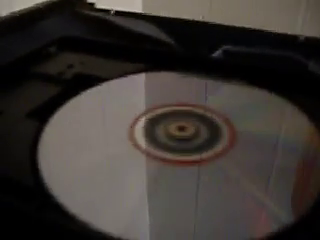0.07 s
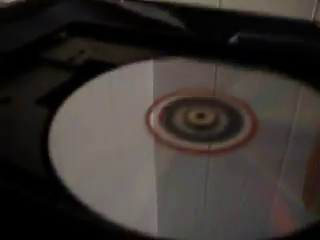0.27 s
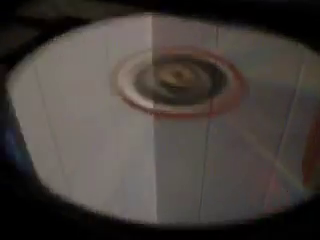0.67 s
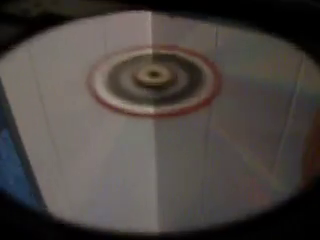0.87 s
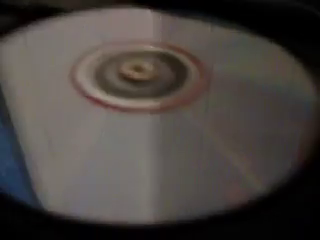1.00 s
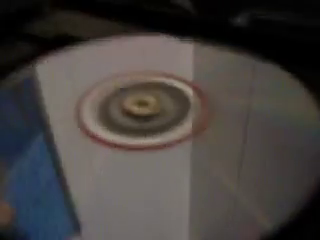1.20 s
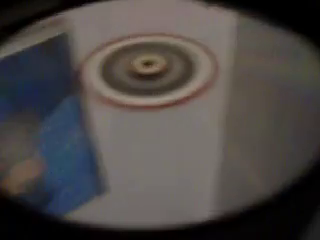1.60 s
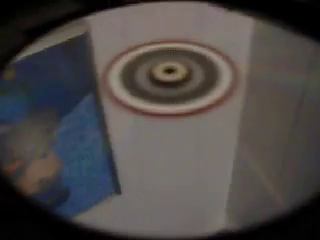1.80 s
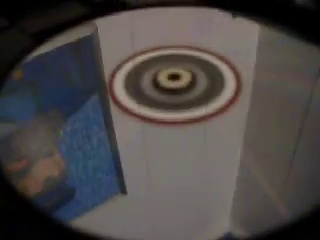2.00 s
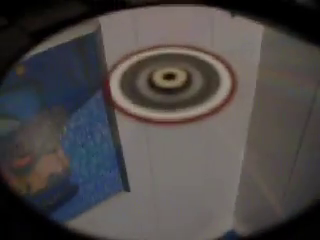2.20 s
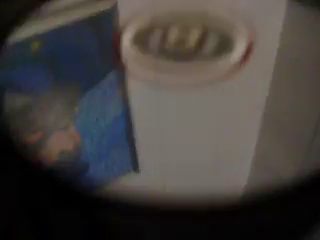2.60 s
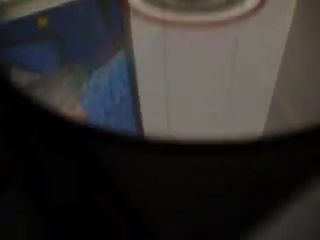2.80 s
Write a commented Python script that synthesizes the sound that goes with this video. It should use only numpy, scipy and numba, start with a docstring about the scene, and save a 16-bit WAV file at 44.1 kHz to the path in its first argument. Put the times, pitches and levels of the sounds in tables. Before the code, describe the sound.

A disc drive, close in a small room, clicks and jolts, then buzzes and grinds at a steady pitch from 0.25 to 0.55 seconds. Sharp plastic clicks and a scrape around 1.1 lead into a second buzz until 1.6. After more jolts, a third starts at 2.35 and groans down by 2.7, followed by a high whistling hiss. A faint hum and thin electronic whine continue throughout.

```python
"""In a small room, close by, an open disc drive tries three times to read a disc.
Its lens servo hisses and small plastic parts click. On each try the motor jolts the frame,
then buzzes and grinds the gears at a nearly steady speed; the last try runs down with a groan.
A hum and a thin electronic whine stay on throughout."""
import sys
import numpy as np
from scipy import signal
from scipy.fft import rfft, irfft
from scipy.io import wavfile
from numba import njit

SR = 44100
rng = np.random.default_rng(int(sys.argv[2]) if len(sys.argv) > 2 else 0)


def generate_wav(signal):
    """Clip the signal to [-1, 1] and save it as 16-bit WAV at the path in sys.argv[1]."""
    frames = np.transpose(np.atleast_2d(signal))
    scaled = np.clip(frames, -1, 1) * 32767
    pcm = np.round(scaled).astype(np.int16)
    wavfile.write(sys.argv[1], SR, pcm)


N = 130095


def undb(db):
    """Turn decibels into a number to multiply by."""
    return 10 ** (np.asarray(db) / 20)


def unit(x):
    """Scale a sound to an average (rms) size of 1."""
    return x / np.sqrt(np.mean(x ** 2) + 1e-18)


def clock():
    """The time of each sample, in seconds."""
    return np.arange(N) / SR


def noise():
    """Plain white hiss."""
    return rng.standard_normal(N)


def wander(rate):
    """A smooth random curve that changes about rate times a second."""
    return unit(irfft(rfft(noise()) * np.exp(-(np.fft.rfftfreq(N, 1 / SR) / rate) ** 2), N))


def colour(x, points):
    """Shape a sound's lows and highs along (f/Hz, level/dB) points, then scale it to size 1."""
    hz, db = np.array(points).T
    curve_db = np.interp(np.log(np.fft.rfftfreq(N, 1 / SR) + 1), np.log(hz), db)
    return unit(irfft(rfft(x) * undb(curve_db), N))


def resonate(x, hz, width_hz):
    """Let a sound ring around one pitch."""
    return signal.lfilter(*signal.iirpeak(hz, hz / width_hz, fs=SR), x)


def gate(start, length, attack, decay):
    """A loudness shape that rises, holds and dies away; all times in seconds."""
    t = clock() - start
    return np.clip(t / attack + .5, 0, 1) * np.exp(-np.maximum(t - length, 0) / decay)


def contour(times, db, fade_s=0.0068):
    """A loudness shape that joins the given points and fades beyond both ends."""
    t = clock()
    outside_s = np.maximum(times[0] - t, 0) + np.maximum(t - times[-1], 0)
    return undb(np.interp(t, times, db)) * np.exp(-outside_s / fade_s)


def rough_tone(cycles, rough, rate):
    """A tone that flutters about rate times a second; rough = 0 makes it pure."""
    angle = 2 * np.pi * (cycles + rng.random())
    tone = np.sin(angle) * (np.sqrt(2) + rough * wander(rate))
    jitter = np.cos(angle) * rough * wander(rate)
    return (tone + jitter) / np.sqrt(1 + rough ** 2)


def glide(rows, rough, rate):
    """A rough tone that slides along (t/s, f/Hz, level/dB) points."""
    times, hz, db = np.array(rows).T
    cycles = np.cumsum(np.interp(clock(), times, hz)) / SR
    return contour(times, db) * rough_tone(cycles, rough, rate)


# the hum and the whine: f/Hz, level/dB, roughness
STEADY_TONES = [(222.8, -48, .7), (7180, -68, 0.1), (7230, -62, 0.2), (7882, -54, 0.2), (8097, -55, 0)]
# tone colour of the background hiss: f/Hz, relative level/dB
HISS_COLOUR = [(20, -60.5), (40, -67), (100, -69.5), (200, -75.5), (700, -83.5), (1300, -88), (3000, -90),
               (6800, -90.5), (7500, -85), (8200, -89.5), (9000, -108)]
def background():
    """A hum, a thin electronic whine and a soft hiss that never stop."""
    hiss = undb(-45) * colour(noise(), HISS_COLOUR)
    return hiss + sum(undb(db) * rough_tone(hz * clock(), rough, rate=12)
                      for hz, db, rough in STEADY_TONES)


# bursts from the lens servo: t/s, length/s, hiss level/dB, whistle level/dB
SERVO_BURSTS = [(0.121, 0.067, -48, -65), (2.228, 0.036, -49, -65), (2.679, 0.44, -46.5, -44.5)]
# tone colour of its hiss: f/Hz, relative level/dB
SERVO_HISS = [(2500, -29), (3500, -12), (4200, -3), (4650, -8), (5150, 0.5), (5500, -1.5), (6400, 2),
              (7200, -4.5), (8500, -25.5)]
# its faint rising squeal near the end: t/s, f/Hz, level/dB
SERVO_SQUEAL = [(2.86, 3890, -55), (2.9, 4270, -48), (2.95, 4310, -57)]
def servo(whistle_hz=6420, width_hz=320, flicker_db=3.7):
    """The servo, which moves the lens, hisses and whistles unsteadily."""
    hiss = colour(noise(), SERVO_HISS) * undb(flicker_db * wander(90))
    whistle = unit(resonate(resonate(noise(), whistle_hz, width_hz), whistle_hz, width_hz))
    out = glide(SERVO_SQUEAL, rough=1.2, rate=110)
    for start, length, hiss_db, whistle_db in SERVO_BURSTS:
        burst = gate(start, length, attack=0.015, decay=0.012)
        out += burst * (undb(hiss_db) * hiss + undb(whistle_db) * whistle)
    return out


# pitches at which the frame rings: f/Hz, width/Hz, level/dB
FRAME_RINGS = [(234, 12, 1), (494, 27, -3.5), (514, 31, -4), (573, 30, 6.5), (660, 64, 5.5), (779, 49, 5),
               (862, 46, 4.5), (945, 23, -22.5), (1790, 460, -23)]
def frame(x):
    """The plastic frame rings when shaken, but gives off little below its lowest pitch."""
    rings = sum(undb(db) * resonate(x, hz, width) for hz, width, db in FRAME_RINGS)
    return signal.sosfilt(signal.butter(2, [170, 2300], 'band', fs=SR, output='sos'), rings)


# clicks of the mechanism: t/s, level/dB, ring f/Hz, ring decay/s, relative snap level/dB
PART_CLICKS = [(0.184, -27, 6960, 0.0013, -4.5), (0.2416, -18, 7600, 0.0006, -4),
               (0.2474, -23.5, 7400, 0.00092, 0), (0.4443, -22, 2180, 0.0005, 11.5),
               (1.0495, -15.5, 1710, 0.0014, -22.5), (1.092, -25, 1463, 0.0015, 7),
               (1.1252, -14.5, 7400, 0.00063, 2), (1.1255, -14.5, 803, 0.0029, -5),
               (1.1605, -19, 2500, 0.0012, -8), (1.1726, -16.5, 2480, 0.0025, -9),
               (1.177, -6, 2610, 0.0017, 1.5), (1.189, -13, 1826, 0.0022, 4.5),
               (1.2092, -26.5, 680, 0.0058, -3), (1.217, -26.5, 6600, 0.0017, -7),
               (1.6297, -41, 916, 0.0022, 9.5), (2.748, -26, 654, 0.0031, -15.5)]
# tones in one click: multiple of its ring pitch, relative level/dB
PART_RINGS = [(0.619, -11), (0.999, 0), (1.15, -24.5), (1.45, -19)]
# tone colour of the snap: f/Hz, relative level/dB
PART_SNAP = [(350, 1), (750, 10.5), (1200, 0.5), (2600, 11), (3500, -9.5), (6400, -4), (7500, -5.5)]
def clicks(snap_s=0.0011, contact_cycles=0.24):
    """Small plastic parts snap and ring briefly, and the frame rings along."""
    out, crack = np.zeros(N), colour(noise(), PART_SNAP)
    for start, db, hz, decay, snap_db in PART_CLICKS:
        age = clock() - start
        live = (age > 0) & (age < .1)
        age = age[live]
        snap = .5 * crack[live] * np.exp(-age / snap_s)
        tones = sum(undb(level) * np.sin(2 * np.pi * hz * ratio * age) for ratio, level in PART_RINGS)
        rise = 1 - np.exp(-age * hz / contact_cycles)
        out[live] += undb(db) * (rise * tones * np.exp(-age / decay) + undb(snap_db) * snap)
    return out + undb(-13.5) * frame(out)


def teeth(knocks_per_s=1100):
    """Slipping gear teeth knock at random moments and with random strength."""
    return (rng.random(N) < knocks_per_s / SR) * rng.choice([-1, 1], N) * (1 + rng.random(N))


# rattling jolts of the gears: t/s, length/s, level/dB, relative rasp level/dB
GEAR_JOLTS = [(0.202, 0.015, -16.5, -9), (0.24, 0.0095, -20.5, -11), (0.454, 0.024, -25, -9),
              (0.532, 0.016, -28, -24.5), (1.249, 0.011, -25.5, -30), (1.586, 0.011, -28, -32),
              (2.264, 0.011, -17.5, -10.5), (2.321, 0.014, -16.5, -7.5), (2.351, 0.011, -16.5, -11.5),
              (2.56, 0.099, -31, -27), (2.691, 0.013, -31, -11)]
# tone colour of the rasping teeth: f/Hz, relative level/dB
RASP_COLOUR = [(400, -6.5), (1400, -6), (2000, 8.5), (2600, -7), (3700, -5), (5000, -2), (6400, -6),
               (7400, -2), (9000, -16.5)]
def jolts():
    """Gear teeth skip as the motor starts or strains, and shake the frame."""
    out, knocks = np.zeros(N), teeth()
    rasp = colour(noise() + unit(knocks), RASP_COLOUR)
    for start, length, db, rasp_db in GEAR_JOLTS:
        push = gate(start, length, attack=.009, decay=0.0074)
        body = unit(frame(push * knocks)) * np.sqrt(np.mean(push ** 2))
        out += undb(db) * (body + undb(rasp_db) * push * rasp)
    return out


# low thumps and one swell of the hum: t/s, level/dB, relative level/dB of the higher tone
LOW_PULSES = [(.208, -19.5, -11), (0.23, -22, -20), (.536, -33.5, 10), (0.545, -26, -21.5),
              (.69, -38.5, -29), (1.599, -32, 6.5), (1.613, -29.5, -15), (2.271, -20.5, -16),
              (2.304, -24, -29), (2.329, -22.5, -4)]
def low_pulses(low_hz=230.7, high_hz=427.6, rise_s=0.0025, low_decay_s=0.026, high_decay_s=0.021):
    """Low thumps as the motor starts or brakes, and one brief swell of the hum after the first try."""
    t, out = clock(), np.zeros(N)
    for start, db, high_db in LOW_PULSES:
        age = np.maximum(t - start, 0)
        low = np.sin(2 * np.pi * low_hz * t) * np.exp(-age / low_decay_s)
        high = np.sin(2 * np.pi * high_hz * age) * np.exp(-age / high_decay_s)
        out += undb(db) * (1 - np.exp(-age / rise_s)) * (low + undb(high_db) * high)
    return out


# one list per try: t/s, f/Hz of the loudest tone, buzz level/dB, grinding level/dB
READ_TRIES = [
    [(.251, 835, -18.5, -30.5), (.262, 821, -15.5, -36), (.33, 821.5, -15.5, -32), (.43, 826, -14, -34.5),
     (.463, 818, -21, -33), (.49, 820, -16, -33.5), (.527, 822, -16, -32.5), (.54, 815, -48, -47),
     (.553, 816, -35, -67)],
    [(1.252, 826, -37, -37), (1.26, 822, -20.5, -33.5), (1.282, 821.5, -16, -34), (1.5, 822, -17.5, -32.5),
     (1.586, 821, -19.5, -30.5), (1.598, 822, -33, -56), (1.612, 824, -40, -48)],
    [(2.355, 822, -30, -40), (2.38, 821, -16.5, -31.5), (2.47, 821.6, -18.5, -32.5),
     (2.555, 811, -23, -30.5), (2.585, 810, -30, -35.5), (2.635, 792, -32, -36), (2.66, 720, -47, -38),
     (2.672, 640, -54, -42)],
]
# tones in the buzz: multiple of the motor's cycle rate, relative level/dB, roughness
BUZZ_TONES = [(2, -16.5, 0.21), (3, -9.5, 0.47), (4, 0.5, 0.3), (5, -22, 0.8), (6, -25, 0.4), (8, -23.5, 0),
              (9, -32.5, 0.4), (10, -30.5, 0.8)]
# tone colour of the grinding gears: f/Hz, relative level/dB
GRIND_COLOUR = [(300, -22.5), (800, 14.5), (1020, 4.5), (1360, -1), (1520, 9), (1750, -5), (1900, 5.5),
                (2150, -1), (2650, -5), (3700, -3), (4400, -1), (5400, -1), (6300, -5.5), (7300, -1.5),
                (8100, -9), (9000, -20)]
def motor(loudest_multiple=4, speed_wobble=0.00393, thrum_lag_s=0.0056):
    """The motor buzzes and thrums; its gears grind in time with it and chatter in the frame."""
    tries = [np.array(rows).T for rows in READ_TRIES]
    times, pitch = np.hstack(tries)[:2]
    hz = np.interp(clock(), times, pitch) * (1 + speed_wobble * wander(52))
    cycles = np.cumsum(hz) / SR / loudest_multiple
    drive = sum(contour(t, db) for t, _, db, _ in tries)
    load = sum(contour(t, db) for t, _, _, db in tries)
    turning = sum(gate(t[0] + thrum_lag_s, t[-2] - t[0] - thrum_lag_s, attack=0.016, decay=0.02)
                  for t, _, _, _ in tries)
    buzz = sum(undb(db) * rough_tone(k * cycles, rough, rate=48.7) for k, db, rough in BUZZ_TONES)
    thrum = undb(-30) * rough_tone(cycles, rough=0.13, rate=160)
    pulsing = 1 + 0.28 * np.cos(2 * np.pi * cycles)
    flicker = undb(wander(190))  # about 1 dB up and down
    grind = undb(5) * pulsing * flicker * colour(noise(), GRIND_COLOUR)
    chatter = undb(-1.5) * unit(frame(teeth()))
    return drive * buzz + turning * thrum + load * (grind + chatter)


# whirr of the freely spinning disc: t/s, f/Hz, level/dB
DISC_WHIRR = [(.7, 557, -73), (0.781, 509, -52.5), (.93, 474, -59)]
def coast():
    """After the first try the disc whirrs faintly, dropping in pitch as it slows."""
    return glide(DISC_WHIRR, rough=0.5, rate=44)


# loudness of the scrape: t/s, level/dB
SCRAPE_LEVELS = [(1.121, -40), (1.137, -34), (1.155, -34), (1.175, -27), (1.2, -30), (1.225, -43),
                 (1.24, -36.5), (1.255, -36)]
# its tone colour: f/Hz, relative level/dB
SCRAPE_TONE = [(25, 9.5), (70, 5), (150, -1), (350, -1), (850, 1), (1200, -0.5), (2600, 1.5), (3300, -9.5),
               (7000, -7), (9000, -38)]
def scrape(flicker_db=3.5):
    """The mechanism scrapes between the clicks that lead into the second try."""
    grit = noise() * undb(flicker_db * wander(400))
    return contour(*np.array(SCRAPE_LEVELS).T) * colour(grit, SCRAPE_TONE)


# falling whine of the gears: t/s, f/Hz, level/dB
GEAR_WHINE = [(2.52, 1530, -45), (2.58, 1418, -41), (2.635, 1142, -39)]
def run_down():
    """The gears whine down roughly as the last try fails."""
    return glide(GEAR_WHINE, rough=1.0, rate=130)


# last groans of the gears: t/s, length/s, f/Hz, level/dB
GEAR_GROANS = [(2.61, 0.05, 828, -33), (2.623, .035, 1040, -31.5), (2.666, 0.016, 693.4, -27),
               (2.689, 0.017, 665, -35)]
def groans():
    """The gears rub to a halt with short, rough tones."""
    out = np.zeros(N)
    for start, length, hz, db in GEAR_GROANS:
        rub = gate(start, length, attack=.009, decay=0.0082)
        out += undb(db) * rub * rough_tone(hz * clock(), rough=0.56, rate=220)
    return out


# bands of the room's echo: f/Hz, fade time/s (to fall by 60 dB), level/dB
ROOM_ECHO = [(184, 0.67, -31.5), (498, 0.54, -35), (910, 0.34, -39.5), (1980, .22, -28), (5050, 0.2, -25.5)]
def room(x, delay_s=.008):
    """The small room adds a faint echo in which the low notes last longest."""
    t, echo = clock(), np.zeros(N)
    for hz, fade_s, db in ROOM_ECHO:
        band = resonate(resonate(noise(), hz, hz * 0.5), hz, hz * 0.5)
        tail = band * np.exp(-np.log(1000) * t / fade_s) * (t > delay_s)
        echo += undb(db) * unit(tail) / np.sqrt(N)
    return x + signal.fftconvolve(x, echo)[:N]


def scene():
    """The drive in its room over the steady background, in one channel."""
    drive = servo() + clicks() + jolts() + low_pulses() + motor()
    drive += coast() + scrape() + run_down() + groans()
    return (background() + room(drive))[None]


@njit
def follow(x, rise_s, fall_s):
    """Track the peaks of a level, rising and falling at different speeds."""
    out, level = np.empty(len(x)), 0.
    for i in range(len(x)):
        level += (x[i] - level) / (SR * (rise_s if x[i] > level else fall_s))
        out[i] = level
    return out


def record(dry, limit=0.19, ratio=8.6, ceiling=0.34):
    """A limiter turns loud moments down, peaks that slip past are rounded and the top treble is cut."""
    peak = follow(np.abs(dry[0]), rise_s=.002, fall_s=0.0098)
    held = dry * (limit / np.maximum(peak, limit)) ** (1 - 1 / ratio)
    rounded = held / (1 + (held / ceiling) ** 4) ** .25
    dulled = signal.sosfilt(signal.butter(20, 8300, fs=SR, output='sos'), rounded)
    return signal.sosfilt(signal.ellip(10, .2, 80, 8900, fs=SR, output='sos'), dulled)


dry = scene()
out = record(dry)
generate_wav(out)
```